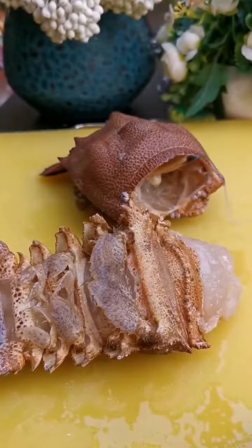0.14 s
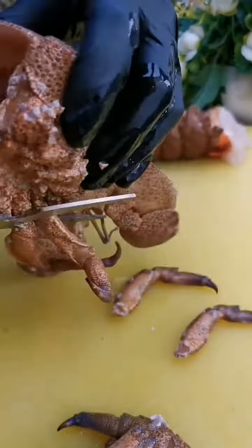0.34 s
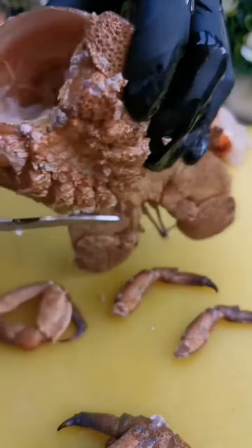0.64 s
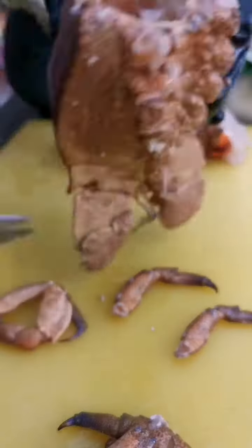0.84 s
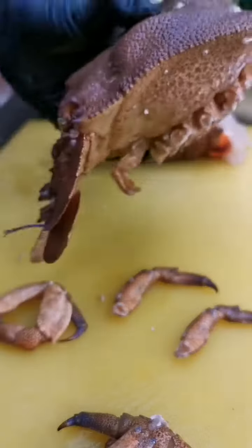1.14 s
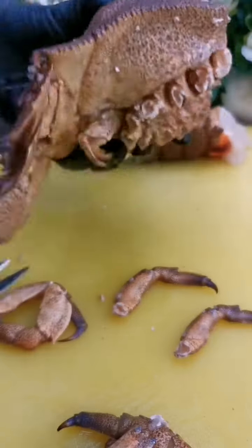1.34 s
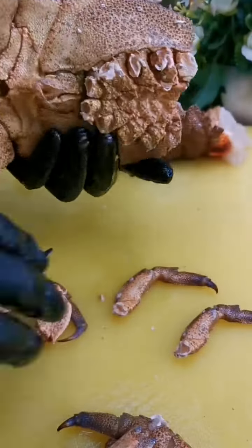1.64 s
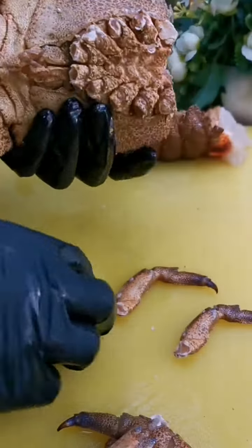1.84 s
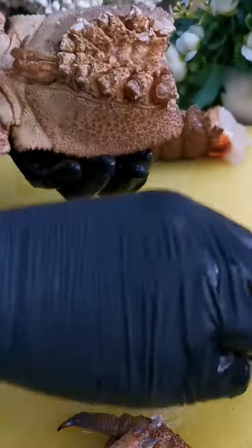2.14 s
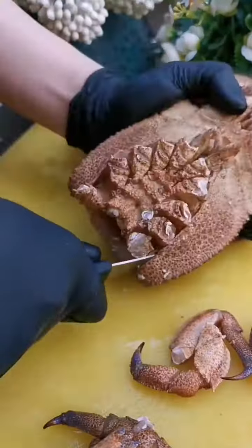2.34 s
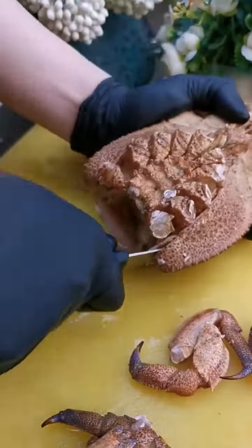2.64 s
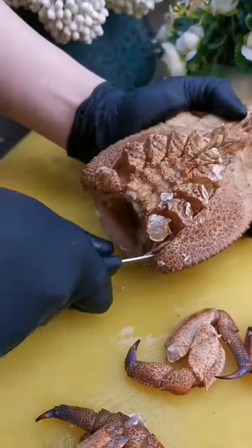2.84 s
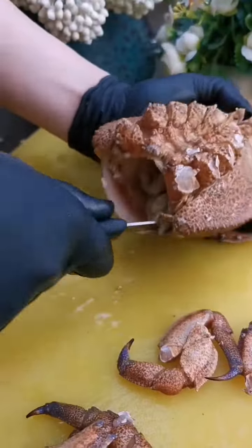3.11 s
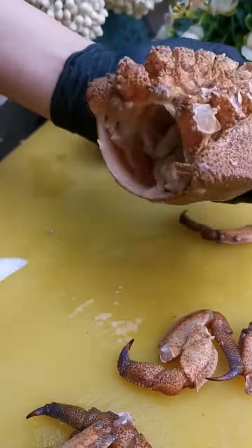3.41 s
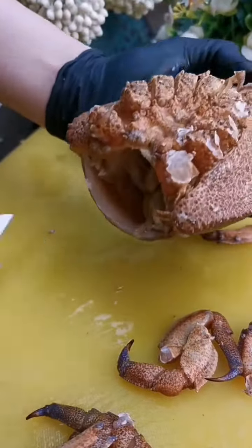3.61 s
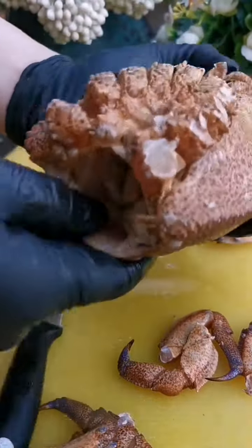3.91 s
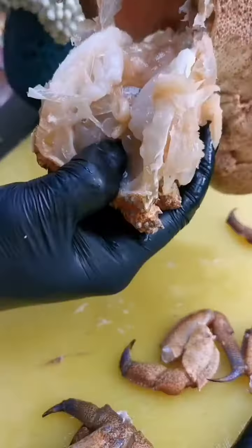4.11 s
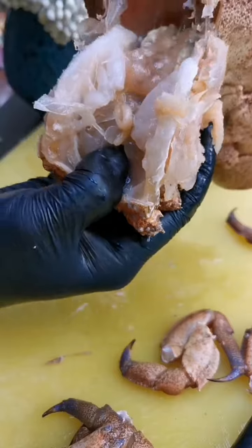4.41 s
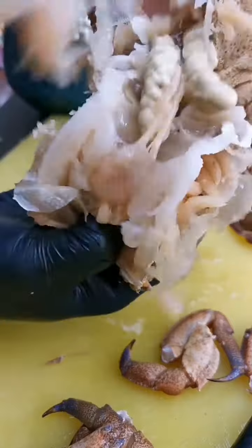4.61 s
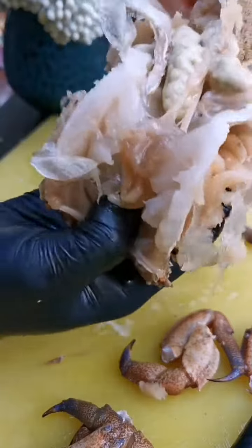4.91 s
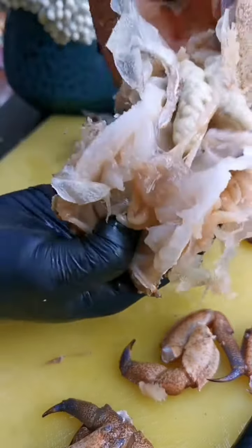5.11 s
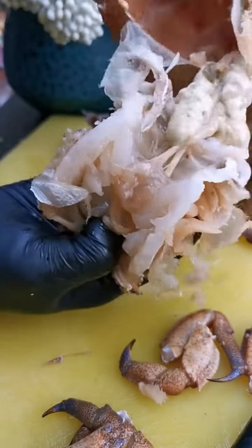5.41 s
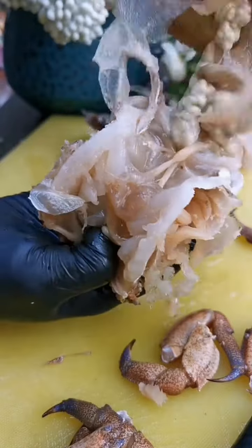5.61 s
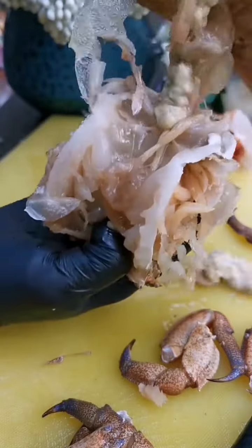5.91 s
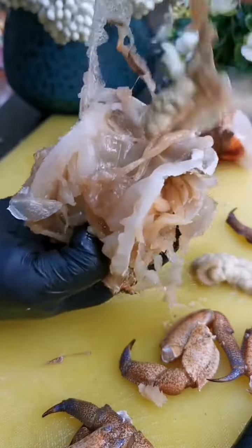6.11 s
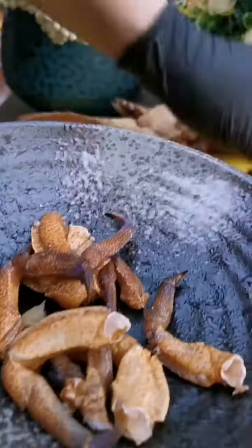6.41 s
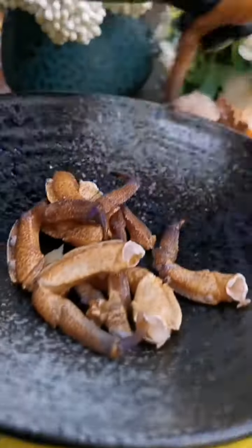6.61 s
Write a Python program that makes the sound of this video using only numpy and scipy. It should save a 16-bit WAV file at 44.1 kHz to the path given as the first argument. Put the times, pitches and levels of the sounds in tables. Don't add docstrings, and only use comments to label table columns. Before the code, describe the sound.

Gloved hands snip, prise and tear brittle shell apart on a plastic board: loud snaps, hollow rattles, crunchy splintering, small wet fizz.

```python
import sys
import numpy as np
from scipy import signal
from scipy.fft import rfft, irfft
from scipy.io import wavfile
from scipy.ndimage import uniform_filter1d

SR = 44100
rng = np.random.default_rng(int(sys.argv[2]) if len(sys.argv) > 2 else 0)


def how_loud(loudness_db):
    steps = np.asarray(loudness_db, float) / 20
    return 10 ** steps


def file_out(sig):
    cols = np.atleast_2d(sig).T
    lim = np.clip(cols, -1, 1)
    pcm = np.round(lim * 32767).astype(np.int16)
    wavfile.write(sys.argv[1], SR, pcm)


N = 297675

# start_s, peak_db, ring_hz, splinter_db,
# burst_ms
LOUD_SNAPS = [(0.109, -19, 2360, -4, 20), (0.121, -36, 2220, 3, 18), (0.375, -20, 4800, -9, 3.46),
              (0.65, -30, 4460, 12.5, 7.2), (0.6653, -20.5, 3440, -11, 18),
              (1.5387, -7, 2690, -14.5, 3.14), (1.6813, -9, 2760, -11, 2.8),
              (2.0175, -12.5, 2780, -15, 6.9), (2.053, -27, 3260, -8.5, 2), (2.0865, -5, 3420, -21, 2.6),
              (2.356, -22.5, 3030, -18, 11), (2.377, -8.5, 3280, -12.5, 1.27),
              (2.6442, -1.5, 2580, -18.5, 0.81), (2.6615, -10.5, 4330, -17.5, 3),
              (2.6893, -25, 4200, -10, 5.6), (3.014, -25.5, 2860, -4, 3.2), (3.0763, -28, 2760, -3, 12),
              (3.0884, -24, 5350, 0, 3.8),
              (3.7605, -9.5, 3000, -21, 2.5), (3.9, -16.5, 2890, -12, 5.2), (4.2094, -23.5, 3690, -9, 2.5),
              (4.3558, -8.5, 3560, -9.5, 2.5), (4.376, -21, 3540, -11, 1.8), (4.402, -17, 3630, 3, 0.82),
              (4.71, -15.5, 3520, -23, 10.6), (4.715, -11.5, 3900, -1.5, 2.4),
              (4.725, -12.5, 3880, -5.5, 7.4), (4.741, -25, 3800, -3.5, 12), (5.3304, -20.5, 2540, -9, 3.8),
              (5.339, -16.5, 2770, -1.5, 6), (6.0956, -22.5, 3580, -11.5, 4.2)]
# start_s, peak_db, ring_hz, burst_ms
CREAKS = [(0.6846, -13, 1900, 3.9), (0.695, -18.5, 3000, 10), (0.7016, -11.5, 3220, 1.5),
          (2.194, -19.5, 2540, 1.3), (2.2184, -24, 2320, 1.5), (2.2457, -21, 2200, 9.9),
          (2.2544, -27, 2240, 25), (2.3235, -30, 2590, 0.91), (2.9347, -26.5, 2400, 0.84),
          (2.9825, -32.5, 4100, 4.3), (3.1257, -31, 1850, 6.1), (3.7749, -8.5, 2400, 1.7),
          (3.9744, -13, 2050, 1.7), (4.0159, -22, 2400, 6.4), (4.02, -23.5, 2200, 6.2),
          (5.2094, -37.5, 3130, 3.8)]
# start_s, peak_db, ring_hz, splinter_db
TICKS = [(0.5503, -37.5, 2080, 5), (0.5713, -33, 5140, 1), (0.6412, -35.5, 4680, -3),
         (0.6567, -21.5, 5100, -1.5), (3.0448, -52, 2270, 4), (3.099, -24, 3160, -13),
         (3.116, -24, 1760, -6.5), (2.634, -34, 3000, -14), (3.723, -53, 4500, 8.5),
         (4.0407, -39.5, 1897, -1), (4.1946, -41.5, 4860, -5), (4.234, -33, 3800, -6),
         (0.533, -36.5, 3500, -10), (0.491, -39.5, 3500, -13), (4.5222, -40, 4930, 11),
         (4.6256, -33, 3680, -8), (5.6035, -42.5, 2830, -6), (5.7441, -31, 4600, -17),
         (6.0545, -32, 3880, -14), (6.2078, -44, 3370, -6), (6.2811, -35.5, 3780, 0.5)]
# start_s, peak_db, ring_hz, splinter_db
FLECKS = [(0.693, -13, 2600, -30.5), (2.915, -41.5, 2600, -23), (3.002, -42, 3000, -12),
          (3.278, -49, 2500, -14.5), (3.298, -50, 2500, -11), (3.4375, -34, 4540, -8),
          (3.649, -50, 4000, -4.5), (4.331, -45.5, 4500, -1.5), (4.423, -27.5, 4470, 10.5),
          (4.5017, -30.5, 5000, 8.5), (4.574, -37, 4500, 2.5), (4.654, -40, 3700, -3),
          (4.7, -37, 4500, -6.5), (2.152, -27, 2400, -22), (2.286, -31, 2400, -19)]


def cracks():
    creak_splinter_db = -114
    tick_ms, fleck_ms = 5.5, 2.2
    creaks = [(s, db, hz, creak_splinter_db, ms) for s, db, hz, ms in CREAKS]
    ticks = [(*row, tick_ms) for row in TICKS]
    flecks = [(*row, fleck_ms) for row in FLECKS]
    return place(LOUD_SNAPS + creaks + ticks + flecks, crack, count=3)


# pitch_hz, width_hz, level_db
SHELL = [(2310, 1420, 9.5), (3190, 1200, 3.5), (3860, 2950, 5.5), (4700, 5100, 3), (1250, 770, 3)]
# pitch_hz, level_db (per Hz)
SPLINTER = [(2940, -23.5), (5000, -9), (6330, -8), (7150, -3), (8230, -4.5), (9220, -2), (11200, -7),
            (15400, -16.5)]


def crack(db, hz, splinter_db, burst_ms, chance):
    fade = burst(burst_ms, size=chance.shape[-1])
    dull_db = 14
    modes = [(f, width, level - dull_db * abs(np.log2(f / hz))) for f, width, level in SHELL]
    modes.append((hz, 900, 0))
    jumps = chance[0] * np.exp(0.88 * chance[1]) * fade
    top_hz = hz * (4.2 if splinter_db > -60 else 1.5)
    shell = peaked(muffled(ring(jumps, modes), top_hz))
    spit = chance[2] * np.exp(0.27 * chance[1])
    edge = peaked(colour(spit, SPLINTER) * fade)
    return how_loud(db + 1.5) * (shell + how_loud(splinter_db + 6.5) * edge)


# start_s, peak_db, pitch_hz, contact_ms
KNOCKS = [(0.375, -29.5, 300, 2), (0.552, -23.5, 640, 1.05), (0.65, -29, 688, 1.8),
          (0.685, -21.5, 1010, 2.6), (1.541, -10, 850, 0.69), (1.683, -18.5, 1054, 0.87),
          (2.358, -20.5, 820, 3.8), (2.378, -21.5, 770, 3.1), (2.643, -29.5, 1310, 2.2),
          (2.934, -20.5, 770, 1.3), (3.125, -33, 710, 3.1), (3.76, -21, 1154, 19), (3.775, -16, 985, 0.96),
          (3.9745, -12, 960, 1.6), (4.022, -13, 900, 2.9), (4.375, -21, 1060, 1.1),
          (4.502, -31.5, 1050, 0.97), (4.714, -18.5, 1250, 0.81), (4.727, -20.5, 794, 0.7),
          (4.759, -27, 1230, 4.2), (5.327, -34, 517, 0.77), (5.3455, -15, 701, 1.64),
          (5.786, -45, 1180, 1.1), (6.54, -47.5, 620, 7.1), (6.612, -48, 600, 13)]
# start_s, peak_db, contact_ms
RATTLES = [(1.634, -19.5, 1.7), (1.99, -34, 6.2), (2.021, -24, 6.4), (2.049, -29, 0.87),
           (2.088, -25.5, 6.7), (2.217, -22.5, 0.75), (2.276, -25, 3.7), (2.303, -27, 4),
           (2.6611, -22, 1.3), (3.012, -28.5, 3.9), (3.89, -24.5, 2), (3.931, -18.5, 1.8),
           (3.962, -24.5, 0.92), (3.992, -24, 2.0), (4.052, -15.5, 1.23)]
# start_s, peak_db, pitch_hz, contact_ms
TAPS = [
    (1.575, -26, 800, 2),
    (1.603, -23, 1200, 2),
    (1.742, -28, 950, 2),
    (1.788, -31.5, 900, 2),
    (3.797, -26, 1000, 2),
    (3.824, -29, 850, 2),
    (3.844, -27.5, 1250, 2),
    (4.08, -30, 888, 2),
    (4.037, -24, 1040, 2),
    (6.47, -41, 950, 5),
]


def knocks():
    rattle_hz, scatter = 927, 0.059
    pitches = rattle_hz * (1 + scatter * rng.uniform(-0.99, 1, len(RATTLES)))
    rattles = [(s, db, hz, ms) for (s, db, ms), hz in zip(RATTLES, pitches)]
    return place(KNOCKS + rattles + TAPS, knock, count=1)


def knock(db, hz, contact_ms, chance):
    steady = 0.93 * (hz < 700)
    force = (steady + chance[0] + 0.5 * chance) * burst(contact_ms, size=chance.shape[-1])
    push = np.gradient(force, axis=1)
    width_hz = min(260 * (900 / hz) ** 2, 380)
    modes = [(hz, width_hz, 6), (0.615 * hz, 350, 6 - hz / 70), (1.288 * hz, 450, -6)]
    return how_loud(db) * peaked(muffled(ring(push, modes), 1300))


# pitch_hz, width_hz, level_db
HOLLOW = [(935, 330, -1), (647, 700, -9.5), (1234, 360, -1.5), (362, 790, -47.5)]


def rubbing():
    slips_per_s, slip_s, smooth_db = 500, 0.0008, 4
    clumps = how_loud(1.8 * evened(uniform_filter1d(rng.standard_normal(N), 500)))
    strengths = how_loud(3.5 * np.minimum(rng.exponential(1, (3, N)), 4))
    slips = strengths * (rng.random((3, N)) < slips_per_s / SR)
    slips = evened(signal.lfilter([1], [1, -np.exp(-1 / (slip_s * SR))], slips))
    grain = clumps * rng.standard_normal((3, 2, N))
    shell, hollow, film = grain * (slips[:, None] + how_loud(smooth_db))
    bodies = [muffled(ring(shell, SHELL), 6400), muffled(ring(hollow, HOLLOW), 1600), colour(film, SPLINTER)]
    return sum(level * evened(body) for level, body in zip(effort(), bodies))


# start_s, length_s, shell_db, hollow_db, wet_fizz_db
RUSTLES = [(0.424, 0.073, -56, -81, -79.5), (0.476, 0.052, -42, -71, -45.5), (1.17, 0.028, -57, -55.5, -39),
           (2.097, 1, -35, -31.5, -65), (2.117, 0.16, -28, -33, -44.5), (3.022, 0.11, -32, -36.5, -30),
           (3.283, 0.25, -51, -87, -46), (3.846, 0.32, -47.5, -37, -81), (4.978, 0.018, -44, -79.5, -33.5),
           (4.079, 0.037, -45, -51, -52), (3.782, 0.12, -37.5, -37, -70), (1.545, 0.12, -33, -35, -50),
           (1.787, 0.23, -61, -72, -53), (5.193, 0.098, -54, -77, -86), (5.313, 0.072, -26.5, -25, -26.5),
           (5.602, 0.014, -42.5, -43, -40), (5.712, 0.097, -46.5, -44.5, -50),
           (5.915, 0.04, -89.5, -70, -58), (6.12, 0.31, -67, -55.5, -54.5),
           (6.453, 0.033, -38.5, -38.5, -41.5)]
# start_s, length_s, shell_db, hollow_db, wet_fizz_db
SETTLING = [
    (-0.02, 0.24, -27.5, -125, -22.5),
    (0.717, 0.2, -35, -45.5, -41.5),
    (1.575, 0.12, -75, -66, -36.5),
    (1.685, 0.14, -30.5, -61.5, -64),
    (2.4, 0.15, -45, -37.5, -67.5),
    (2.687, 0.18, -43.5, -54, -48.5),
    (4.373, 0.32, -39, -52, -39),
    (4.71, 0.24, -30, -38.5, -36),
    (5.377, 0.18, -41, -65, -70),
    (6.467, 0.2, -53.5, -70.5, -57),
]
# shell_db, hollow_db, wet_fizz_db
FIDGET_DB = [-63, -87.5, -60]


def effort():
    settle_db, settle_bend, settle_rise_s = 40, 5.6, 0.0067
    t = control_times()
    levels = how_loud(FIDGET_DB)[:, None] * np.ones(len(t))
    for start, length, *dbs in RUSTLES:
        swell = np.sin(np.pi * np.clip((t - start) / length, 0, 1)) ** 0.6
        levels = levels + how_loud(dbs)[:, None] * swell * sinking(t, start, 0.0011, 0)
    for start, length, *dbs in SETTLING:
        fall_db = settle_db * (np.maximum(t - start, 0) / length) ** settle_bend
        fade = sinking(t, start, settle_rise_s, np.minimum(fall_db, 200))
        levels = levels + how_loud(dbs)[:, None] * fade
    return [np.interp(np.arange(N) / SR, t, level) for level in levels]


# start_s, peak_db, pitch_hz, length_ms
SQUEAKS = [
    (3.31, -66, 2370, 32),
    (3.362, -49, 5090, 17),
    (3.372, -57, 2150, 12),
    (3.394, -54, 2700, 18),
    (3.405, -57.5, 4180, 31),
    (3.44, -67, 2670, 30),
    (1.443, -46, 2350, 4.9),
    (6.558, -50.5, 6450, 23),
]


def squeaks():
    return place(SQUEAKS, squeak, count=1)


def squeak(db, hz, ms, chance):
    glide, roughness = 0.039, 0.39
    u = np.minimum(np.arange(chance.shape[-1]) / SR / (ms / 1000), 1)
    wobble = roughness * uniform_filter1d(chance, size=60)
    turns = np.cumsum(hz * (1 + glide * u + wobble), axis=1) / SR
    return how_loud(db) * np.sin(np.pi * u) * np.sin(2 * np.pi * turns)


# start_s, left_minus_right_db
SIDEWAYS = [
    (0.0, 2),
    (0.47, -4),
    (2.2, -1),
    (2.54, -15),
    (3.89, -5.5),
    (5.861, -3),
    (5.961, -7.5),
    (6.202, -6.5),
    (6.3, -2.5),
    (6.75, 10),
]
# pitch_hz, left_minus_right_db
NEAR_TILT = [(60, -1), (110, 3.5), (700, -8.5), (1290, -6), (2380, -12), (4400, -10.5), (8120, -3.5),
             (15000, -16.5)]


def ports(shared, other):
    lag_ms, same = 0.37, 0.043
    lean = how_loud((np.interp(np.arange(N) / SR, *np.transpose(SIDEWAYS)) + 7) / 2)
    left = same * shared + np.sqrt(1 - same ** 2) * other
    left = np.roll(left, round(lag_ms * SR / 1000))
    return np.array([lean * colour(left, NEAR_TILT, 0.16), colour(shared, NEAR_TILT, -0.91) / lean])


# start_s, level_db, sinking_db_per_s (negative grows)
PUSHES = [(-0.02, -45.5, 37), (0.362, -58, 16), (0.65, -58, 39), (1.529, -43.5, 51), (1.669, -51, 53),
          (2.02, -48.5, 62.5), (2.36, -45, 25), (2.92, -49, 32.5), (2.939, -40, 253), (3.54, -64, 63),
          (3.76, -58.5, -26), (4.34, -74.5, 81.5), (4.71, -47, 199), (5.32, -71, 100), (6.049, -77.5, -12),
          (6.44, -57, 22)]
# pitch_hz, level_db (per Hz)
THUD_COLOUR = [(18, -47.5), (30, -12), (65, -5), (107, -8), (176, -10.5), (270, -6), (450, -13.5),
               (580, -9)]
# pitch_hz, width_hz, level_db
BOARD = [(79.7, 11, 2.5), (147.2, 69, -3.5), (184.7, 16, -1.5)]


def thuds():
    rise_s, rest_db = 0.025, -76.5
    t = control_times()
    level = how_loud(rest_db)
    for start, db, sink in PUSHES:
        level = level + how_loud(db) * sinking(t, start, rise_s, sink * np.clip(t - start, 0, 1))
    rumble = spread(THUD_COLOUR + [(900, -44.5)])
    return np.interp(np.arange(N) / SR, t, level) * evened(rumble + 4 * ring(rumble, BOARD))


# start_s, peak_db, pitch_hz, time_to_fall_60_db_s
THUMPS = [(2.351, -38, 98, 0.32), (2.41, -43, 66, .3), (2.7, -46, 172, .15), (2.74, -44, 73, 0.99),
          (3, -28, 76, 0.17), (2.95, -38, 235, 0.19), (2.47, -47.5, 190, .3), (4.0, -45, 135, .5),
          (3.16, -43, 66, 0.47), (3.54, -47, 165, 0.26), (1.66, -47.5, 74, 0.67), (2.1, -47.5, 73.7, 0.87)]


def thumps():
    rise_s, sag, lag_s = 0.012, 0.3, 0.0014
    t = np.arange(N) / SR
    board = np.zeros(N)
    for start, db, hz, t60 in THUMPS:
        u = np.clip(t - start, 0, 1.5)
        swing = np.sin(2 * np.pi * hz * u * (1 - sag * u / 2)) * (1 - np.exp(-u / rise_s))
        board += swing * how_loud(db - 60 * u / t60) * sinking(t, start, 0.001, 0)
    return np.array([np.roll(board, round(lag_s * SR)), board]) * how_loud([[-3], [2.5]])


# pitch_hz, time_to_fall_60_db_s
KITCHEN = [(200, 0.42), (530, 0.41), (1400, 0.34), (3700, 0.36), (9700, 0.31), (16000, 0.21)]
SCENE_CHANGES = [0, .35, .648, 1.53, 1.677, 2.354, 2.91, 3.75, 4.088, 4.335, 4.69, 5.3, 6.04, 6.43, 7]
# pitch_hz, left_minus_right_db
FAR_TILT = [(60, -2), (200, -2), (700, -8), (1290, -6), (2380, -7), (4400, -3.5), (8120, -2), (15000, -10)]


def kitchen(faces):
    out, size = np.zeros((2, N)), SR * 2 // 3
    for start, end in zip(SCENE_CHANGES, SCENE_CHANGES[1:]):
        a, b = round(start * SR), min(round(end * SR), N)
        echoes = np.zeros((2, 2, size))
        places = np.arange(200, size - 20, 20)
        at = places + rng.integers(0, 20, (2, 2, len(places)))
        np.put_along_axis(echoes, at, rng.choice([-1., 1.], at.shape), 2)
        hz, t, z = signal.stft(echoes, SR, nperseg=256)
        fade = how_loud(-60 * t / read(KITCHEN, hz)[:, None])
        tail = signal.istft(z * fade, SR, nperseg=256)[1]
        tail = tail / np.linalg.norm(tail[0])
        wet = signal.fftconvolve(faces[None, :, a:b], tail, axes=2).sum(1)
        out[:, a:b] = wet[:, :b - a]
    return np.array([colour(out[0], FAR_TILT, 0.063), colour(out[1], FAR_TILT, -1.2)])


# pitch_hz, level_db (per Hz)
AIR = [(25, -3.5), (101, -13), (892, -19.5), (2350, -29), (4130, -28), (7870, -35.5), (11200, -29),
       (15400, -33.5)]


def air():
    return how_loud(-59) * spread(AIR)


# pitch_hz, likeness (1 same, -1 opposite)
SAME = [(60, 0.35), (240, 0.96), (950, 0.092), (3770, -0.14), (15000, -0.35)]


def spread(points):
    hz = np.fft.rfftfreq(N, 1 / SR)
    a, b = rfft(rng.standard_normal((2, N)))
    same, lean = read(SAME, hz), how_loud(read(FAR_TILT, hz) / 2)
    right = same * a + np.sqrt(1 - same ** 2) * b
    pair = np.array([a * lean, right / lean])
    return evened(irfft(pair * how_loud(read(points, hz)), N))


def place(rows, make, count):
    size = 1536
    out = np.zeros((4, N + size))
    for (start, *row), chance in zip(rows, rng.standard_normal((len(rows), count, 4, size))):
        at = round(start * SR)
        out[:, at:at + size] += make(*row, chance.squeeze())
    return out[:, :N]


def burst(ms, size):
    u = np.arange(size) / SR / (ms / 1000)
    return (1 - np.exp(-(u / 0.25) ** 2)) * np.exp(-u)


def ring(x, modes):
    out = 0
    for hz, width, db in modes:
        pole = np.exp((2j * np.pi * hz - np.pi * width) / SR)
        out = out + how_loud(db) * signal.lfilter([(1 - abs(pole)) ** 2], [1, -2 * pole, pole * pole], x).real
    return out


def muffled(x, hz):
    return signal.lfilter(*signal.butter(2, min(hz, 0.4 * SR), fs=SR), x)


def sinking(t, start, rise_s, fall_db):
    cut = min(s for s in SCENE_CHANGES[1:] if s > start + 0.02)
    return np.clip((t - start) / rise_s, 0, 1) * how_loud(-fall_db) * (t < cut)


def control_times():
    return np.arange(0, N / SR + 0.002, 0.001)


def read(points, hz):
    f, value = np.transpose(points)
    return np.interp(np.log(hz + 1), np.log(f + 1), value)


def colour(x, points, share=1):
    size = x.shape[-1]
    gain = how_loud(share * read(points, np.fft.rfftfreq(size, 1 / SR)))
    return irfft(rfft(x) * gain, size)


def evened(x):
    return x / np.sqrt(np.mean(x ** 2) + 1e-20)


def peaked(x):
    return x / abs(x).max()


def scene():
    snaps, hollow, rub = cracks() + squeaks(), knocks(), how_loud(-14) * rubbing()
    hits = how_loud(-10.5) * snaps + how_loud(-17) * hollow
    late_walls = np.roll(hits[2:], round(0.011 * SR), axis=1)
    wet = kitchen(hits[:2] + late_walls + how_loud(-2.5) * rub)
    close = ports(*(snaps[:2] + hollow[:2] + rub))
    return close + wet + thuds() + thumps() + air()


def phone_thinning(x):
    blur_db, starve_db, top_hz = -22, -1.7, 16000
    hz, t, z = signal.stft(x, SR, nperseg=1024)
    power = uniform_filter1d((abs(z) ** 2).sum(0), size=8, axis=0)
    power = power[4::8].repeat(8, 0)[np.minimum(np.arange(513), 511)]
    level_db = 10 * np.log10(uniform_filter1d(power, size=2, axis=1) + 1e-20)
    above_db = level_db - uniform_filter1d(level_db, size=90, axis=0)
    kept = (above_db > starve_db) | (hz[:, None] < 5000)
    frame_db = level_db.mean(0)
    kept |= np.diff(frame_db, prepend=0) > 3
    loud = frame_db > np.percentile(frame_db, 97)
    busy = level_db[:90].mean(0) - level_db[200:].mean(0) > 22
    kept &= hz[:, None] < top_hz + 900 * loud - 900 * (busy & ~loud)
    blur = how_loud(blur_db) * abs(z) * np.exp(2j * np.pi * rng.random(z.shape))
    return signal.istft((z + blur) * kept, SR, nperseg=1024)[1][:, :N]


def roll_off(x):
    return signal.sosfilt(signal.butter(12, 16990, fs=SR, output="sos"), x)


def record(dry):
    blink = 1 - 0.85 * np.exp(-((np.arange(N) / SR - 0.355) / 0.007) ** 4)
    limited = 0.94 * np.tanh(blink * dry / 1.139)
    mix = phone_thinning(limited)
    return roll_off(mix)


dry = scene()
out = record(dry)
file_out(out)
```